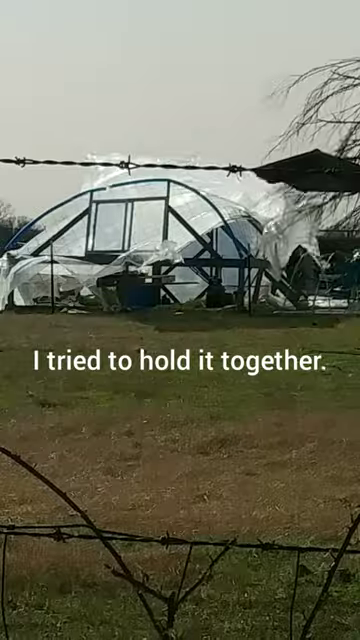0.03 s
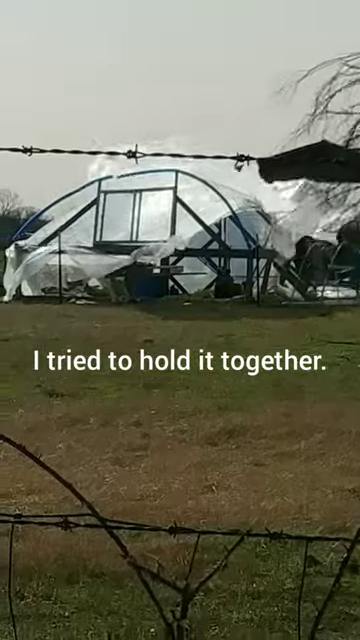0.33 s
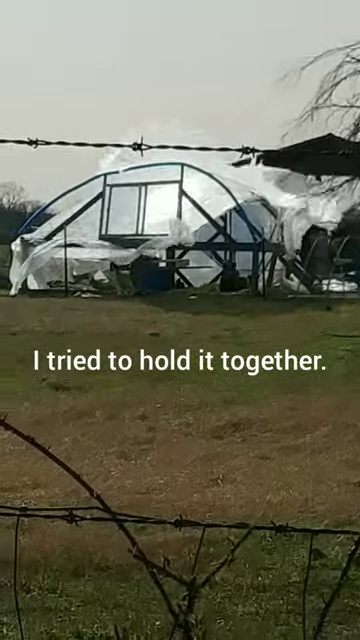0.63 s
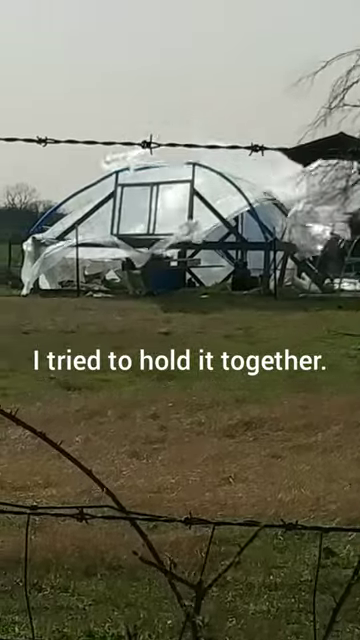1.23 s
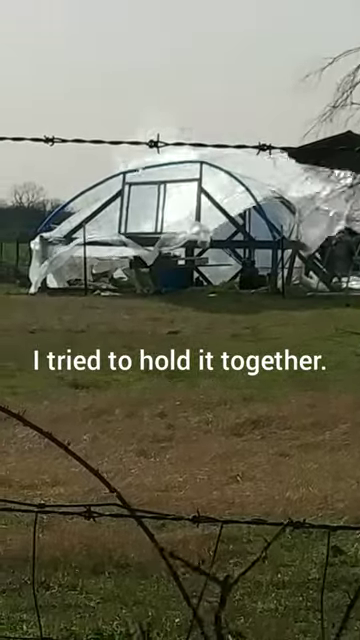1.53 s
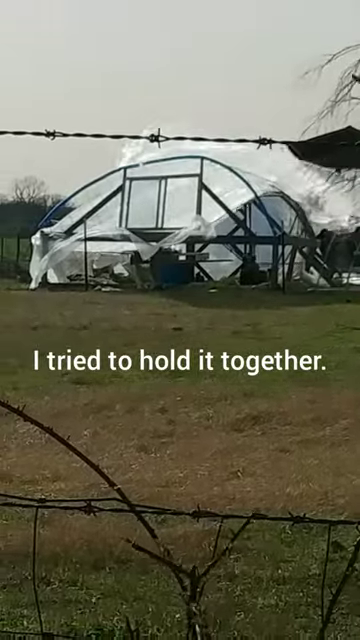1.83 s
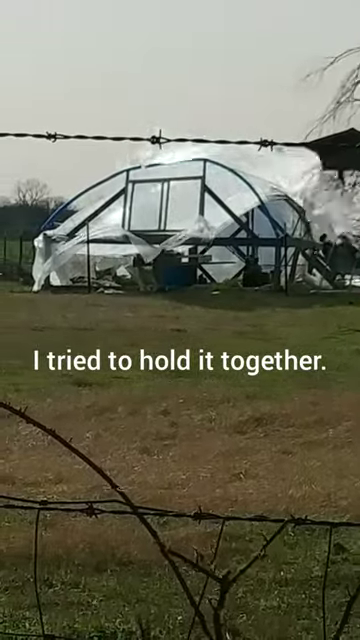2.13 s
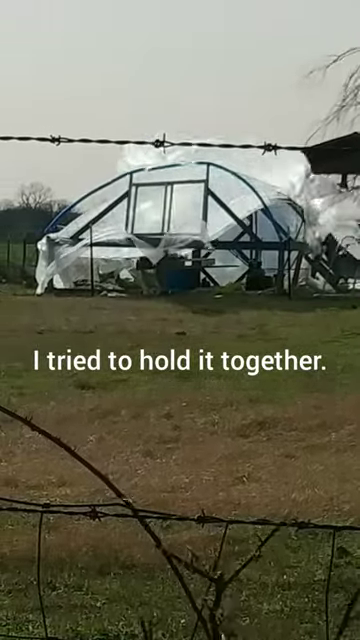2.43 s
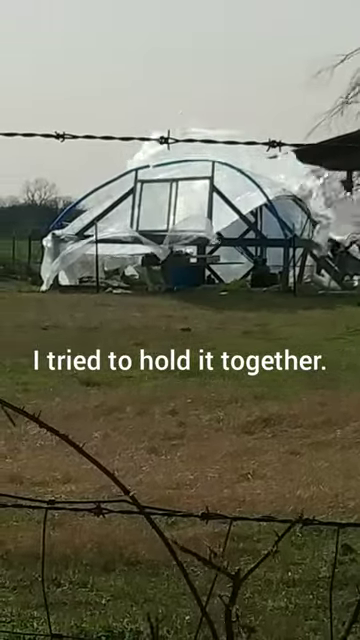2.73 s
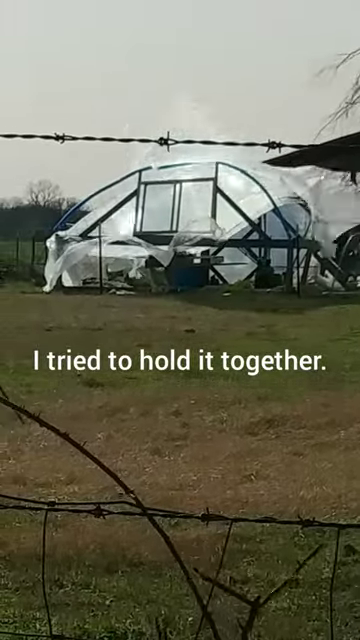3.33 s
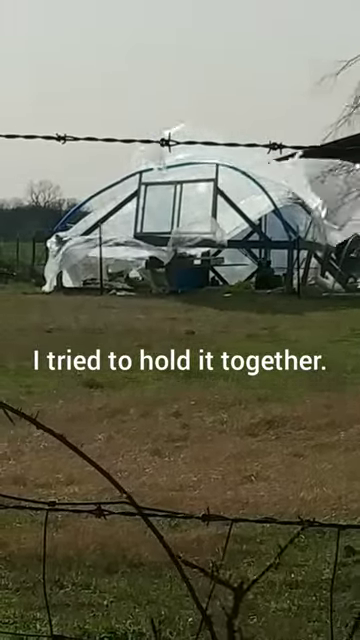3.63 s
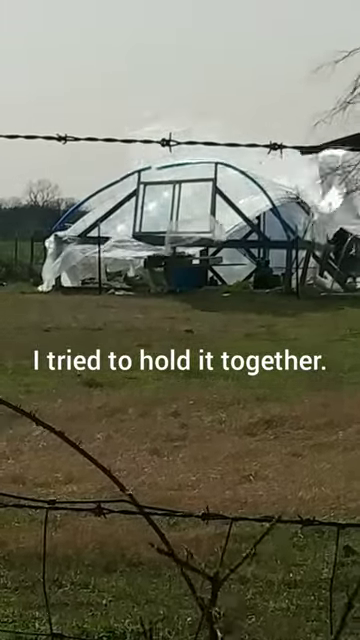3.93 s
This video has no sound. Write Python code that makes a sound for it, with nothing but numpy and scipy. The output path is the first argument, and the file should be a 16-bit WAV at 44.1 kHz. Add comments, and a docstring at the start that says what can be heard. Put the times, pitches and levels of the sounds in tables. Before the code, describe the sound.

Gusty wind buffets the microphone while torn plastic sheeting rustles and flaps.

```python
"""A steady rush of wind fades in, with torn plastic sheeting rustling on a hoophouse across an open field.
The film buckles in thousands of tiny clicks; when a fold runs out to the edge, the sheet flaps and cracks.
Turbulent gusts buffet the microphone with a low rumble, single eddies thump and rasp on it,
and the hardest of them briefly overload it."""
import sys
import numpy as np
from scipy import signal
from scipy.fft import rfft, irfft, next_fast_len
from scipy.io import wavfile
from scipy.ndimage import uniform_filter1d, map_coordinates

SR = 44100
rng = np.random.default_rng(int(sys.argv[2]) if len(sys.argv) > 2 else 0)


def put_to_file(sound):
    """Save the sound as 16-bit audio at rate SR, in the file named by the first command-line argument."""
    columns = np.atleast_2d(sound).T  # one column per channel
    safe = np.clip(columns, -1, 1)
    whole_steps = np.round(safe * 32767)
    wavfile.write(sys.argv[1], SR, whole_steps.astype(np.int16))


N = 176400

# Levels are relative, ahead of the gains applied below.
# flaps of the sheeting: crack_s, level_db, swell_time_constant_s, treble_over_body_db
SHEET_FLAPS = [(0.359, -36.5, 0.0091, -1.5), (.653, -30.5, 0.0026, -3), (.862, -37.5, .029, -8.5),
               (1.102, -39, 0.0055, 5), (1.17, -37, 0.0024, -14), (1.188, -31, 0.013, -2.5),
               (1.57, -38.5, 0.019, 1.5), (1.613, -28, 0.0029, 5.5), (1.649, -43, 0.014, -6),
               (1.955, -30, 0.0052, -18), (2.062, -31.5, 0.0089, -9.5), (2.152, -40.5, 0.013, -25),
               (2.245, -38.5, .003, 5), (2.313, -32.5, 0.0036, 8), (2.512, -34, 0.0034, -2),
               (2.544, -33.5, 0.012, -2), (2.644, -36.5, 0.0046, -2), (2.738, -33, 0.0096, 1.5),
               (2.868, -40, 0.0087, 2.5), (3.46, -28, 0.0051, -0.5), (3.541, -34, 0.018, -3.5),
               (3.571, -26, 0.0019, -9), (3.635, -29.5, .014, -2), (3.9, -27.5, 0.0052, -1.5),
               (3.951, -37.5, 0.0048, 1.5), (3.986, -34, 0.0052, 6.5)]
# eddies striking the microphone: peak_s, level_db, rasp_over_thump_db
EDDY_STRIKES = [(1.367, -22.5, -13), (1.469, -15.5, -31), (1.482, -23.5, -13), (1.497, -16.5, -30),
                (1.536, -19.5, -21), (1.57, -18.5, -27), (1.604, -21, -27), (1.737, -20.5, -30),
                (1.782, -34.5, -24), (1.813, -22.5, -35), (2.892, -9, -13), (2.968, -9, -6.5),
                (2.986, -15, -20), (2.996, -12, -16), (3.016, -17.5, -4.5), (3.059, -16.5, -11),
                (3.084, -10.5, -11.5), (3.098, -12, -5.5), (3.166, -5.5, -8.5), (3.184, -13, -9),
                (3.217, -23, -19), (3.227, -21.5, -0.5), (3.26, -13.5, -25), (3.276, -11.5, -18),
                (3.291, -13.5, -34), (3.319, -15, -23), (3.346, -7.5, -7.5), (3.357, -15, -3),
                (3.373, -12, -20), (3.42, -13, -5.5), (3.434, -13.5, -5), (3.445, -11, -6.5),
                (3.459, -14, -26), (3.515, -22, -22), (3.821, -8.5, -15), (3.841, -13.5, -9.5),
                (3.856, -15, -10.5), (3.904, -16, -3.5)]
# shoves of air that pin the diaphragm at its limit: peak_s, half_width_s
AIR_SHOVES = [(3.45, 0.0016)]
# envelopes: time_s, level_db
RUSTLE_LEVEL = [(0, -55.5), (.55, -41), (.72, -46.5), (.9, -41.5), (1.46, -42.5), (1.8, -40.5),
                (2.17, -37.5), (2.25, -43.5), (2.6, -35.5), (2.68, -43.5), (2.78, -39), (3.03, -43),
                (4, -37.5)]
GUST_PRESSURE = [(0, -51.5), (1.28, -50.5), (1.34, -25.5), (1.41, -40), (1.46, -26.5), (1.61, -27),
                 (1.69, -50), (1.81, -31), (1.88, -43), (2.06, -38), (2.25, -52), (2.56, -34), (2.81, -45),
                 (2.87, -23.5), (2.94, -30.5), (2.98, -18), (3.04, -29.5), (3.11, -18), (3.3, -26.5),
                 (3.48, -19.5), (3.54, -41), (3.595, -30.5), (3.65, -37), (3.79, -34.5), (3.815, -26),
                 (4, -32.5)]
WIND_LEVEL = [(0, -42), (1.3, -40), (2.3, -41.5), (4, -36)]
FADE_IN = [(0, -110), (.12, -54), (.147, -7), (.3, 3)]
# spectral shapes: frequency_hz, gain_db
FLAP_BODY_SPECTRUM = [(200, -23), (900, 8.5), (1300, -2), (1900, 2), (5000, -12.5), (9000, -74)]
CREASE_SPECTRUM = [(1000, -22), (3000, 3), (7000, 8.5), (15000, -2)]
SHEET_SPECTRUM = [(200, -31), (900, -0.5), (1250, -5.5), (1600, 3.5), (2200, 0), (2550, -7), (2900, -0.5),
                  (3150, -10.5), (3450, -2), (4000, -15.5), (4700, -8.5), (5200, -34), (6100, -12),
                  (15000, -14)]
RUMBLE_SPECTRUM = [(25, -29), (115, 2.5), (300, -1), (450, -6), (700, -20.5), (3000, -86)]
THUMP_SPECTRUM = [(40, -19), (125, 0.5), (270, 3.5), (500, -1.5), (1100, -27.5), (4000, -83)]
RASP_SPECTRUM = [(250, -22.5), (540, 4), (1000, 1.5), (1800, -17), (5000, -42)]
WIND_SPECTRUM = [(30, -17), (70, -6), (130, -2.5), (300, 0.5), (450, -6), (620, -10.5), (880, -2.5),
                 (1250, -13.5), (2500, -25.5), (7000, -25)]
MIC_RESPONSE = [(7600, 0), (8300, -14), (10500, -26), (15000, -39)]

CRINKLES_PER_S, CRINKLE_SPREAD_DB, HISS_SHARE = 3000, 4.5, 0.32
REBOUND_S, REBOUND_DB = 0.016, -13.5  # a flap's weaker second crack
SCATTER_S, SCATTER_DB = 0.051, -19.5  # its tail off the frame and ground
SWIRL_DB, SWIRL_KNEE_DB, SWIRL_SLOPE = -14.5, -16, 0.21  # rasp over rumble at the knee; extra dB per dB


def flaps():
    """Travelling wave: a fold runs along the sheet, swells to a crack at the edge, rebounds and dies."""
    body, treble = np.zeros(N), np.zeros(N)
    for crack_s, level_db, swell_s, treble_db in SHEET_FLAPS:
        t = np.arange(N) / SR - crack_s
        first = crack(t, swell_s)
        rebound = amp(REBOUND_DB) * crack(t - REBOUND_S, swell_s)
        scatter = (t > 0) * amp(SCATTER_DB) * (1 - first) * np.exp(-np.abs(t) / SCATTER_S)
        envelope = first + rebound + scatter
        body += amp(level_db) * envelope
        treble += amp(level_db + treble_db) * envelope
    spurts = amp(wobble(depth_db=7, rate_hz=260))  # creases give way unevenly
    return body * even(crinkle(FLAP_BODY_SPECTRUM)) + treble * even(spurts * crinkle(CREASE_SPECTRUM))


def crack(t, swell_s, release_ratio=0.58):
    """Exponential growth and decay: an envelope that peaks at t = 0 and falls faster than it rose."""
    time_constant_s = swell_s * np.where(t < 0, 1, release_ratio)
    return np.exp(-np.abs(t) / time_constant_s)


def rustle(gain_db=-0.5, crackle_db=-12):
    """Flutter: loose sheeting crinkles without pause in the airflow, and small creases crackle on top."""
    spurts = amp(wobble(depth_db=9, rate_hz=89))
    crackle = unit(spurts * crinkle(CREASE_SPECTRUM))
    film = shifting_folds(crinkle(SHEET_SPECTRUM)) + amp(crackle_db) * crackle
    flutter_db = wobble(depth_db=1.96, rate_hz=23)
    return amp(curve(RUSTLE_LEVEL) + gain_db + flutter_db) * film


def crinkle(spectrum):
    """Buckling: the film gives off dense, tiny random clicks that partly merge into hiss."""
    clicks = (rng.random(N) < CRINKLES_PER_S / SR) * rng.choice([-1, 1], N)
    strengths = amp(CRINKLE_SPREAD_DB * rng.standard_normal(N))
    hiss = np.sqrt(HISS_SHARE) * rng.standard_normal(N)
    return coloured(np.sqrt(1 - HISS_SHARE) * unit(clicks * strengths) + hiss, spectrum)


def shifting_folds(x, depth_db=1.5):
    """Spectral modulation: folds sound in turn, so the colour shifts in patches of time and frequency."""
    spectrogram = signal.stft(x, nperseg=512)[2]
    patches = uniform_filter1d(rng.standard_normal(spectrogram.shape), size=8, axis=0)
    patches = uniform_filter1d(patches, size=10, axis=1)
    shifted = spectrogram * amp(depth_db * unit(patches))
    return unit(signal.istft(shifted, nperseg=512)[1][:N])


def buffeting(gain_db=-2):
    """Turbulent pressure on the microphone: gusts rumble, brighter as they grow; eddies thump and rasp."""
    churn_db = wobble(depth_db=2, rate_hz=65.2)
    pressure_db = curve(GUST_PRESSURE) + gain_db + churn_db
    rumble = amp(pressure_db) * noise(RUMBLE_SPECTRUM)
    swirl = amp(pressure_db + SWIRL_DB + SWIRL_SLOPE * (pressure_db - SWIRL_KNEE_DB))
    thump, rasp = np.zeros(N), np.zeros(N)
    for peak_s, level_db, rasp_db in EDDY_STRIKES:
        push = amp(level_db + gain_db) * pulse(peak_s, half_width_s=0.0035)
        thump += push
        rasp += amp(rasp_db) * push
    ragged = amp(wobble(depth_db=4.5, rate_hz=227.6))  # eddies break up into short pops
    thumps = thump * even(ragged * noise(THUMP_SPECTRUM))
    rasps = np.hypot(swirl, rasp) * even(ragged * noise(RASP_SPECTRUM))
    return rumble + thumps + rasps


def field_wind():
    """Turbulence: air flowing over the field and the frame makes a broad, gently swaying rush."""
    return amp(curve(WIND_LEVEL) + wobble(depth_db=1, rate_hz=9)) * noise(WIND_SPECTRUM)


def amp(db):
    """Decibels to amplitude ratio."""
    return 10 ** (np.asarray(db) / 20)


def unit(x):
    """Normalisation to rms 1."""
    return x / np.sqrt(np.mean(x ** 2) + 1e-20)


def even(x, size=280):
    """Running normalisation: rms near 1 over about size samples; the finer grain stays."""
    power = uniform_filter1d(uniform_filter1d(x ** 2, size), size)
    return x / np.sqrt(np.abs(power) + 1e-20)


def curve(rows):
    """Linear interpolation of (time_s, value) points at every sample."""
    return np.interp(np.arange(N) / SR, *np.transpose(rows))


def wobble(depth_db, rate_hz):
    """Random modulation: a smooth curve in dB through rate_hz random points a second."""
    points = rng.standard_normal(N // 20)
    return depth_db * map_coordinates(points, [np.arange(N) * rate_hz / SR], mode="mirror")


def pulse(peak_s, half_width_s):
    """Gaussian pulse of height 1; the half width is its standard deviation."""
    return np.exp(-.5 * ((np.arange(N) / SR - peak_s) / half_width_s) ** 2)


def gain(spectrum, hz):
    """Amplitude response, interpolated in dB on a log frequency axis."""
    frequency_hz, gain_db = np.transpose(spectrum)
    return amp(np.interp(np.log(hz + 1), np.log(frequency_hz), gain_db))


def filtered(x, response):
    """Linear filtering: the spectrum of x times a frequency response."""
    size = next_fast_len(N + SR // 2)
    return irfft(rfft(x, size) * response(np.fft.rfftfreq(size, 1 / SR)), size)[:N]


def coloured(x, spectrum):
    """Spectral shaping of x, at rms 1."""
    return unit(filtered(x, lambda hz: gain(spectrum, hz)))


def noise(spectrum):
    """Turbulent pressure as spectrally shaped Gaussian noise."""
    return coloured(rng.standard_normal(N), spectrum)


def saturate(x, ceiling=0.8):
    """Overload: the microphone's output bends softly towards a ceiling (full scale is 1)."""
    return x / (1 + (x / ceiling) ** 4) ** (1 / 4)


def scene():
    """Superposition: wind and sheeting add at one microphone."""
    return (field_wind() + rustle() + flaps() + buffeting())[None]


def record(dry, shove_db=11, low_cut_hz=83, top_hz=15500):
    """Saturation and band limiting: the sound fades in, peaks are rounded, bass and treble roll off."""
    faded = dry[0] * amp(curve(FADE_IN))
    shove = amp(shove_db) * sum(pulse(peak_s, half_width_s) for peak_s, half_width_s in AIR_SHOVES)
    choked = saturate(faded + shove) - saturate(shove)  # the shove, itself unheard, pins the diaphragm
    low_cut = signal.butter(3, low_cut_hz, "highpass", fs=SR, output="sos")
    rounded = saturate(signal.sosfilt(low_cut, choked))
    return filtered(rounded, lambda hz: gain(MIC_RESPONSE, hz) * (hz < top_hz))[None]


dry = scene()
out = record(dry)
put_to_file(out)
```